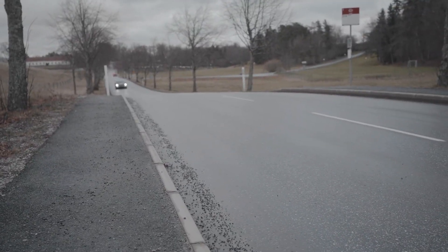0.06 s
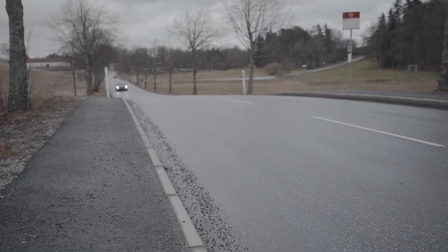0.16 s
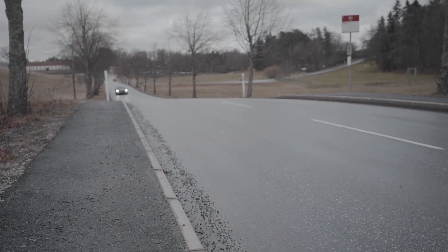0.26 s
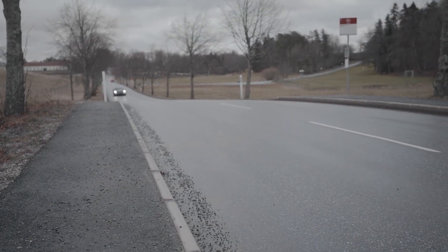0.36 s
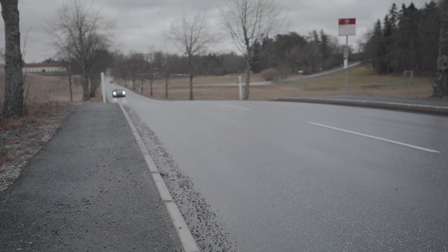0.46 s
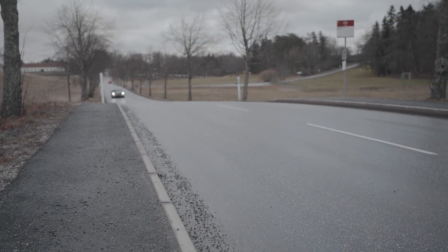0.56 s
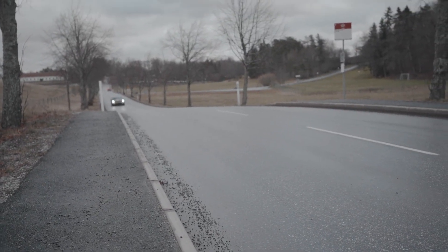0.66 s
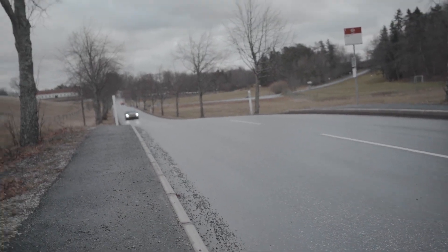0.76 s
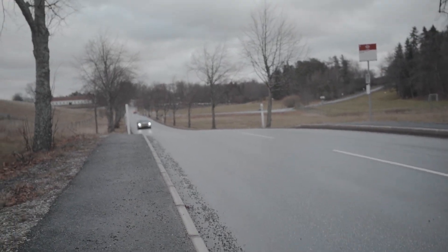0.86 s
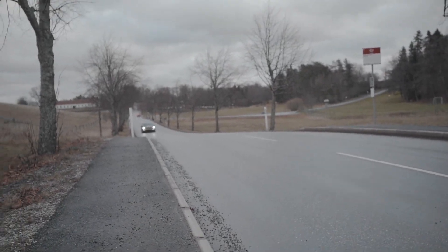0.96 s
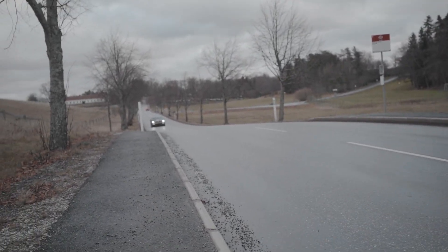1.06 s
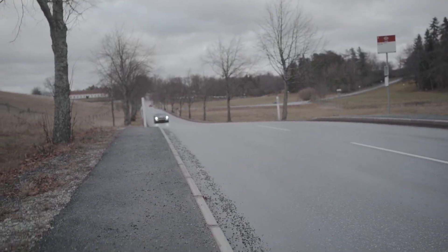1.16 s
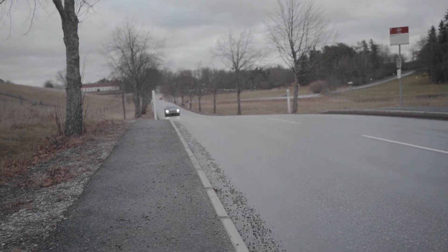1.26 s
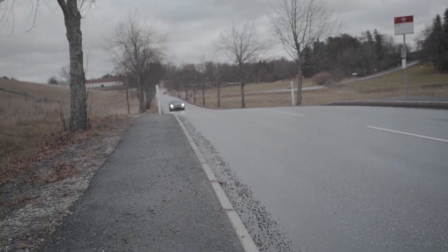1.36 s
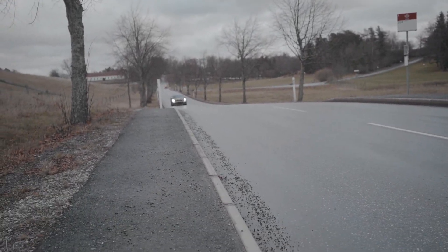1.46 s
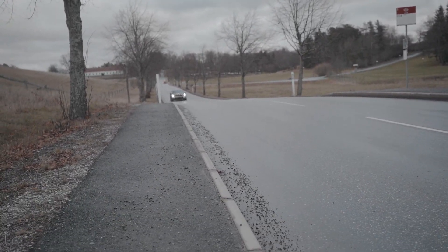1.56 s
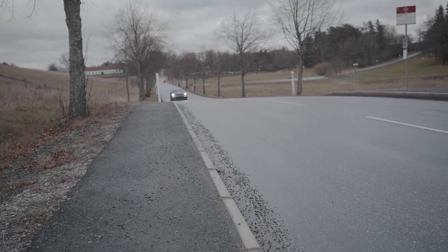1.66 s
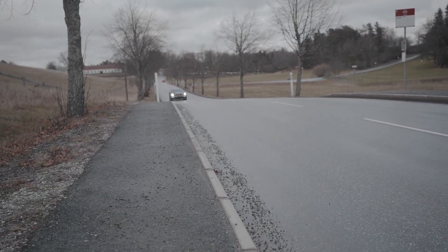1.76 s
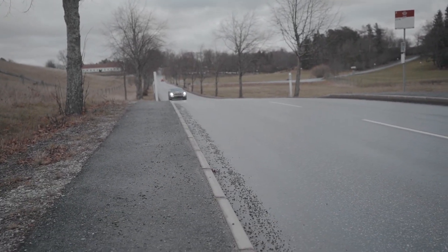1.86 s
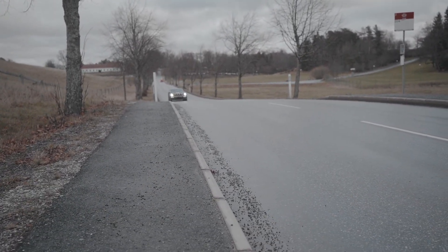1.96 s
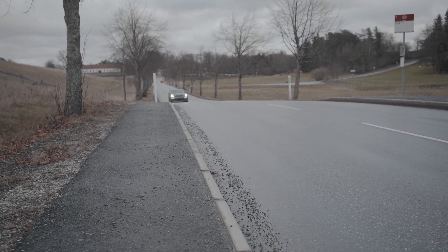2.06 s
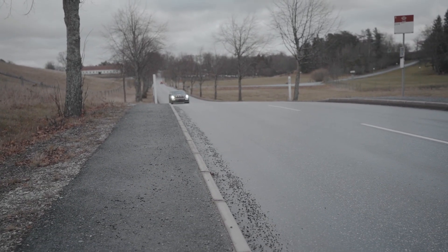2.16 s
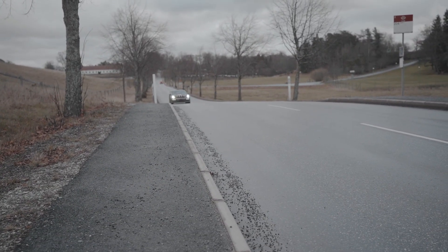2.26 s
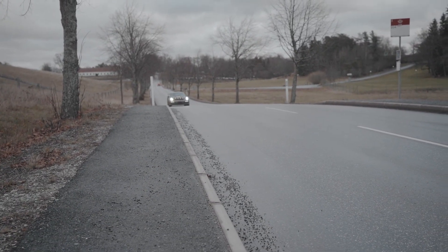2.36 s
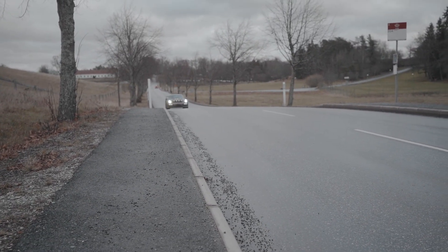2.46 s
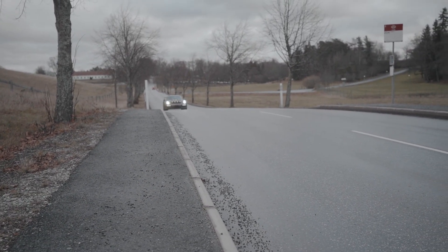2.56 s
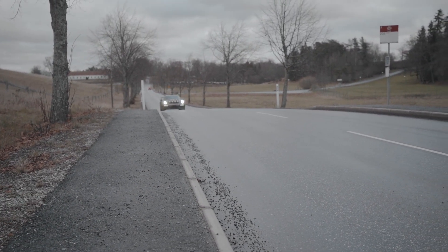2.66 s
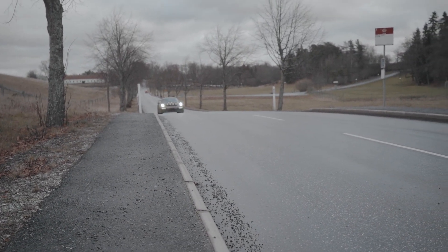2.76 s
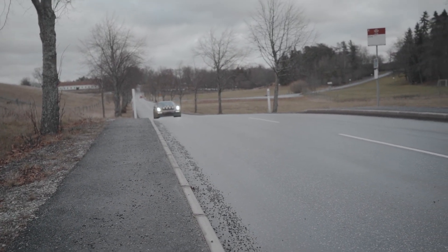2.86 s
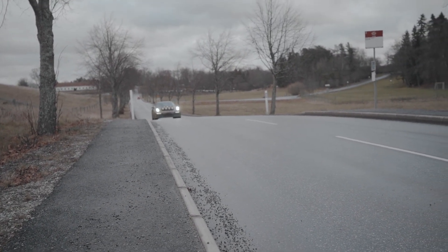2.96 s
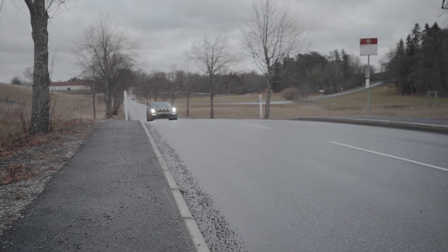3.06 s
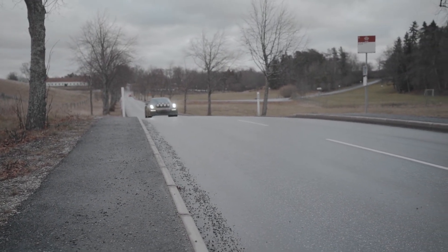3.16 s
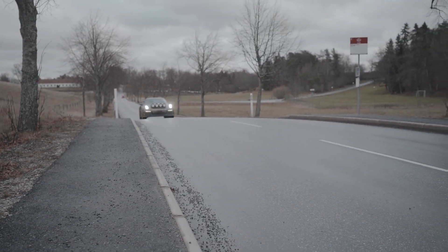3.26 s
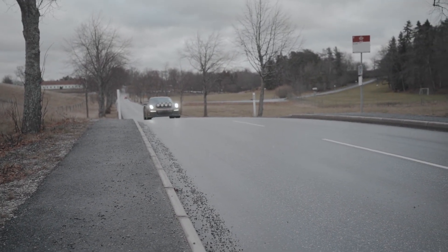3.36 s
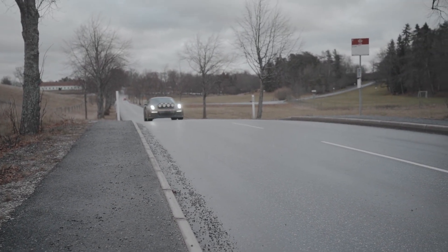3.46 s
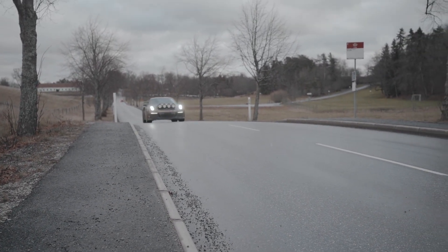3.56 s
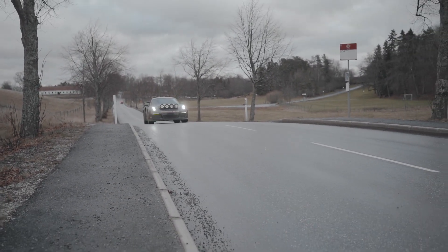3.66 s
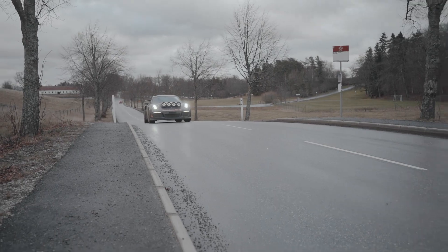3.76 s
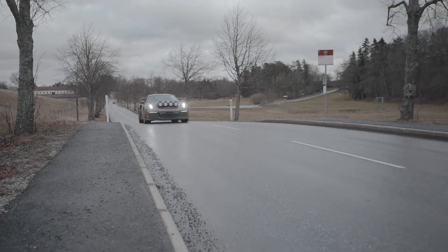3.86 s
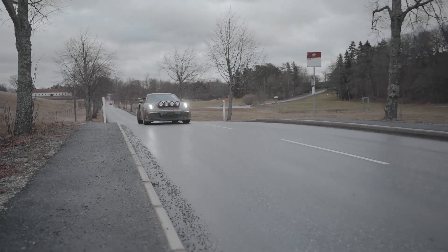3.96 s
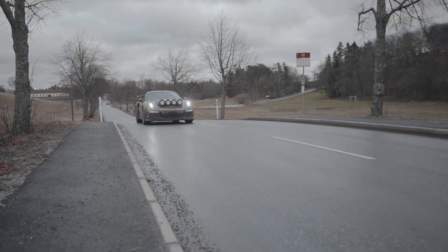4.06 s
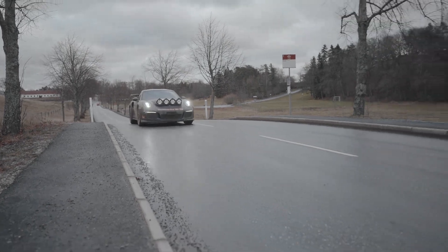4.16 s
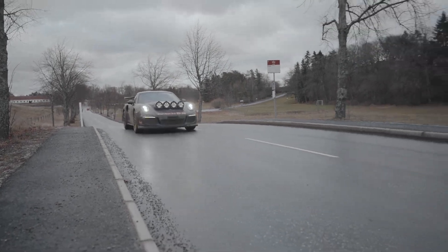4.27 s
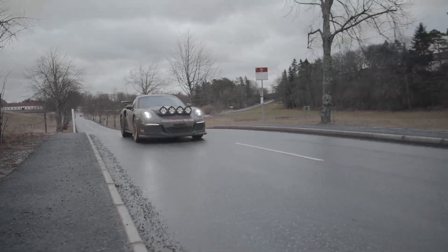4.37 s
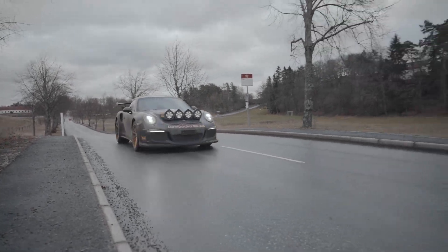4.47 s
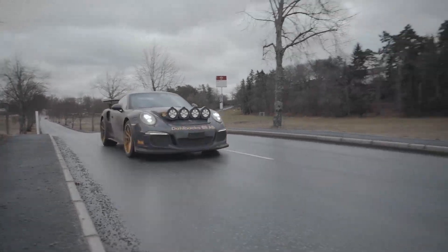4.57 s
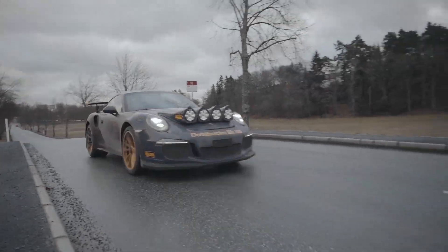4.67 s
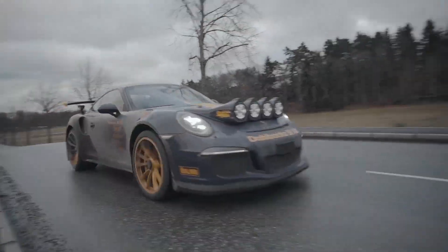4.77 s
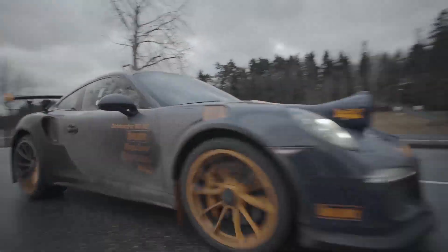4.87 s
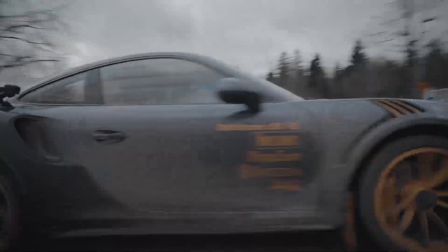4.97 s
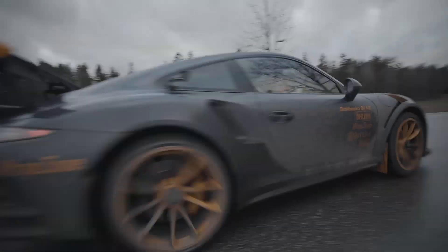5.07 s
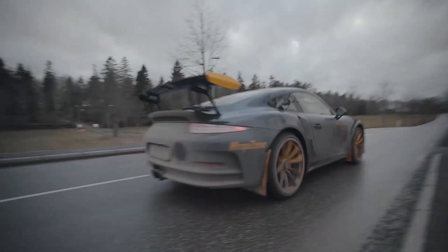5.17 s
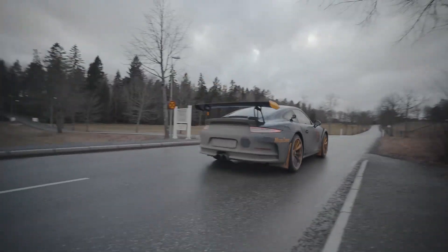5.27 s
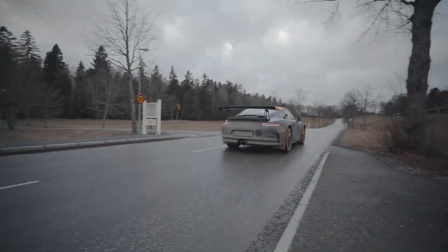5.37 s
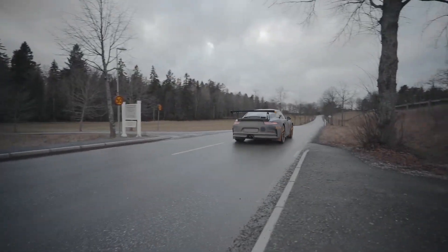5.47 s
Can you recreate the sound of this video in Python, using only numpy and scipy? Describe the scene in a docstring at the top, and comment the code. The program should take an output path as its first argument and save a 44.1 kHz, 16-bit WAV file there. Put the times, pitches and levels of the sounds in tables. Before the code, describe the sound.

On a damp country road, a light breeze rumbles against a microphone at the kerb while a sports car approaches with a steady, growing hum and hissing tyres. After nearly four seconds the engine accelerates into a snarl, pops briefly at an upshift and climbs again with one sharp exhaust crack. The car passes very close at the end, loud and distorted.

```python
"""A light breeze buffets a microphone at the kerb as a flat-six sports car cruises up a damp country road,
its tyres hissing and its periodic firing sounding a steady note through the silencer. The throttle
opens and the pulses steepen into a snarl; at the upshift the tailpipe pops in a short burble. The car
pulls on, its exhaust driving a limiter, with one sharp crack where the firing note drops out. As it
passes at arm's length the pressure overloads the input stage, which clips it towards a square wave."""
import sys
import numpy as np
from scipy import signal
from scipy.fft import rfft, irfft, next_fast_len
from scipy.io import wavfile

SR = 44100
rng = np.random.default_rng(int(sys.argv[2]) if len(sys.argv) > 2 else 0)


def to_wav(s):
    """Save 16-bit WAV."""
    ch = np.atleast_2d(s).T  # columns
    pcm = np.round(np.clip(ch, -1, 1) * 32767)  # PCM
    wavfile.write(sys.argv[1], SR, pcm.astype(np.int16))


N = 243431
TIME = np.arange(N) / SR
CYLINDERS = 6


def from_db(db):
    """Amplitude ratio of a level in decibels."""
    return 10 ** (np.asarray(db) / 20)


def unit_power(x):
    """Normalisation to a mean square of 1."""
    return x / np.sqrt(np.mean(x ** 2) + 1e-20)


def ramp(x, start, end):
    """Linear transition from 0 at start to 1 at end."""
    return np.clip((x - start) / (end - start), 0, 1)


def bell(s, width_s):
    """Gaussian envelope of height 1 around one moment."""
    return np.exp(-((TIME - s) / width_s) ** 2)


def in_time(rows):
    """Linear interpolation of each column against the times in the first."""
    s, *columns = np.transpose(rows)
    return [np.interp(TIME, s, column) for column in columns]


def gain_at(response, hz):
    """Frequency response on a logarithmic axis, falling 12 dB an octave past its last point."""
    points_hz, db = np.transpose(response)
    hz = np.maximum(hz, 1)
    return from_db(np.interp(np.log(hz), np.log(points_hz), db)) / np.maximum(hz / points_hz[-1], 1) ** 2


def drift(rate):
    """Low-pass random modulation of unit spread, changing about rate times a second."""
    step, settling = 40, 2000
    pole = np.exp(-2 * np.pi * rate * step / SR)
    white = rng.standard_normal(N // step + settling + 2)
    slow = signal.lfilter([1], [1, -2 * pole, pole * pole], white)[settling:]
    return np.interp(np.arange(N) / step, np.arange(len(slow)), unit_power(slow))


def noise(spectrum):
    """Spectral shaping of white noise, at unit power."""
    size = next_fast_len(N)
    hz = np.arange(size // 2 + 1) * SR / size
    return unit_power(irfft(rfft(rng.standard_normal(size)) * gain_at(spectrum, hz), size)[:N])


def resonant_noise(hz, width_hz):
    """Random excitation of two equal resonators in series, at unit power."""
    r = np.exp(-np.pi * width_hz / SR)
    section = [1 - r, 0, r - 1, 1, -2 * r * np.cos(2 * np.pi * hz / SR), r * r]
    return unit_power(signal.sosfilt([section, section], rng.standard_normal(N)))


def ring(impulses, hz, t60):
    """Damped oscillator: a unit impulse starts a decaying sine of height 1."""
    r, w = np.exp(-np.log(1000) / (t60 * SR)), 2 * np.pi * hz / SR
    return signal.lfilter([0, np.sin(w)], [1, -2 * r * np.cos(w), r * r], impulses + 1e-18)


def decay(x, seconds):
    """Leaky integration: every input dies away with the given time constant."""
    return signal.lfilter([1], [1, -np.exp(-1 / (seconds * SR))], x + 1e-18)


# Wind spectrum. Each row: frequency in Hz, relative density in dB.
WIND_SPECTRUM = [(3, 4), (6, 11), (11, 16), (17, 13), (25, 5), (39, -4), (62, -11), (100, -17), (200, -32)]
# The breeze rises, holds and drops to a lull. Each row: time in seconds, level in dB.
BREEZE_LEVELS = [(0, -30.5), (1.3, -18.5), (2.3, -15), (3.6, -17), (3.95, -24.5), (4.6, -25.5)]
# Separate gusts. Each row: centre in seconds, level in dB.
GUSTS = [(.16, -16), (.46, -16.5), (.58, -21), (.9, -16), (1.39, -17.5), (1.49, -17.5), (1.66, -12.5),
         (1.9, -20), (2.12, -18.5), (2.23, -18), (2.45, -24), (2.6, -21), (2.84, -22), (3.3, -19),
         (3.64, -14)]
# Single pushes of pressure. Each row: start in seconds, peak in dB, swell time constant in seconds.
BUFFETS = [(0.095, -10, .018), (0.435, -20, .005), (0.83, -14, .014), (1.158, -5, .006), (2.07, -13, .008),
           (2.33, -18, .004)]
# Faint gritty rustles. Each row: start in seconds, length in seconds, level in dB.
RUSTLES = [(.7, 0.75, -71.5), (2.945, 0.081, -67), (3.39, 0.014, -64)]


def breeze():
    """Turbulence at the microphone gives slow pressure fluctuations, with a few tiny rustles."""
    steady = from_db(in_time(BREEZE_LEVELS)[0] + 2 * drift(4.2))
    gusts = sum(from_db(db) * bell(s, width_s=0.05) for s, db in GUSTS)
    pressure = (steady + gusts) * noise(WIND_SPECTRUM)
    for s, db, swell_s in BUFFETS:
        age = np.clip((TIME - s) / swell_s, 0, 20)
        pressure -= from_db(db) * (age / 2) ** 2 * np.exp(2 - age)
    rustling = sum(from_db(db) * bell(s + length / 2, length / 2) for s, length, db in RUSTLES)
    grit = from_db(2.5 * drift(120)) * resonant_noise(hz=10500, width_hz=9000)
    return pressure + rustling * grit


PASS_S, SPEED_M_PER_S, CLOSEST_M = 5.307, 11.77, 1.835
HIDDEN_M, CLEAR_M = 49.4, 17.5   # between these distances the car comes over a crest
SHIELD_M = 12.5   # nearer than this, the body stops hiding the rear engine
THROTTLE_S, OPENING_S, BARK_S, SHIFT_S = 3.782, 0.19, 3.91, 4.135


def ahead_m():
    """Uniform motion: the road left before the tail is level with the microphone."""
    return SPEED_M_PER_S * (PASS_S - TIME)


def voice_gain(voice):
    """Spreading, shadowing, directivity and engine load set the gain of one voice of the car."""
    # Each voice lists, in dB: base level at the closest point, loss per doubling of distance,
    # loss behind the crest, gain at full load, gain in the bark of pick-up, gain from the rear.
    close_db, doubling_db, crest_db, load_db, bark_db, rear_db = voice
    ahead = ahead_m()
    doublings = np.log2(np.hypot(ahead, CLOSEST_M) / CLOSEST_M)
    path_loss_db = doubling_db * doublings + crest_db * ramp(ahead, CLEAR_M, HIDDEN_M)
    facing_db = rear_db * ramp(ahead, SHIELD_M, 0)
    shift_cut = 0.89 * bell(SHIFT_S, width_s=0.04)
    load = ramp(TIME, THROTTLE_S, THROTTLE_S + OPENING_S) * (1 - shift_cut)
    engine_db = load_db * load + bark_db * bell(BARK_S, width_s=0.1)
    return from_db(close_db - path_loss_db + facing_db + engine_db)


# Distant road noise. Each row: time in seconds, roar level in dB, hiss level in dB.
FAR_ROAD = [(0.03, -38, -61), (0.2, -41, -60), (0.35, -40.5, -52), (1.31, -47, -53), (1.36, -45, -57),
            (1.98, -50, -54), (2.2, -48.5, -49)]
# Tyre and gas roar, wet hiss and fine spray. Each row: frequency in Hz, relative density in dB.
ROAR_SPECTRUM = [(100, -10.5), (250, -8.5), (450, 0), (660, -1), (850, 0.5), (1150, 0.5), (1550, -3),
                 (2000, -11), (2800, -19.5), (4500, -47.5), (9000, -36)]
HISS_SPECTRUM = [(800, -21), (2000, 2), (3300, -2), (4000, -6.5), (5300, -11.5), (6200, -17), (8500, -17),
                 (9800, -29.5), (13000, -32), (15500, -33.5)]
SPRAY_SPECTRUM = [(2000, 0.5), (5000, 2), (6500, -4.5), (9000, -0.5), (10800, -15), (13000, -10),
                  (16000, -17)]
# Their levels in dB, as listed in voice_gain.
ROAR_VOICE = (-8.5, 6.5, 8.5, -1, 4.5, 19)
HISS_VOICE = (-4, 11.5, -1.5, -2, 7, 14)
SPRAY_VOICE = (-3.5, 16, 33, -2.5, 6.5, 8.5)
# The car's thin whine. Each row: frequency in Hz, resonator bandwidth in Hz, level in dB.
WHINE_BANDS = [(3220, 45, -63), (3596, 38, -65)]


def road_noise(phase):
    """Broadband noise of tyres, gas and spray; near and far sources are incoherent and add in power."""
    far_roar_db, far_hiss_db = in_time(FAR_ROAD)
    roar_gain = np.hypot(voice_gain(ROAR_VOICE), from_db(far_roar_db))
    hiss_gain = np.hypot(voice_gain(HISS_VOICE), from_db(far_hiss_db))
    throb = unit_power(1 + 0.09 * np.cos(phase) + 0.054 * np.cos(phase / 2))   # each firing, each bank
    lowpass = signal.butter(3, 5000, fs=SR, output="sos")
    roar = roar_gain * from_db(0.72 * drift(6.7)) * throb * signal.sosfilt(lowpass, noise(ROAR_SPECTRUM))
    hiss = hiss_gain * from_db(0.5 * drift(5)) * noise(HISS_SPECTRUM)
    whine = sum(from_db(db) * resonant_noise(hz, width) for hz, width, db in WHINE_BANDS)
    spray = voice_gain(SPRAY_VOICE) * noise(SPRAY_SPECTRUM)
    return roar + hiss + spray + whine * ramp(TIME, 0, 0.29)


# Transmission of the silencer. Each row: frequency in Hz, gain in dB.
SILENCER_RESPONSE = [(60, -5.5), (200, 3), (310, -1), (470, -2.5), (560, -3.5), (680, -16.5), (1100, -21.5),
                     (2200, -21)]


def harmonics(orders, phase, hz, flutter, rate, response=SILENCER_RESPONSE):
    """Source and filter: harmonics sweep through a fixed response, fluttering in level and phase."""
    total = 0
    for multiple, db in orders:
        angle = multiple * phase + rng.uniform(0, 2 * np.pi)
        wave = (1 + flutter * drift(rate)) * np.sin(angle) + flutter * drift(rate) * np.cos(angle)
        total += np.sqrt(2) * from_db(db) * gain_at(response, multiple * hz) * wave
    return total


# Low engine orders. Each row: multiple of the six-firing cycle, level before the silencer in dB.
THROB_ORDERS = [(2, -4), (3, -8.5), (4, -7)]
# Churned air beside the car. Each row: frequency in Hz, relative density in dB.
CHURN_SPECTRUM = [(10, 3), (30, 9.5), (70, -15), (110, 5), (180, -7.5), (300, -13.5), (700, -38.5)]


def wake(phase, firing_hz):
    """Near field: churning air and the lowest engine orders are felt only beside and behind the car."""
    full_db, reach_m, loss_db_per_m = 9.5, 2.2, 8.5
    throb = harmonics(THROB_ORDERS, phase / CYLINDERS, firing_hz / CYLINDERS, flutter=0.28, rate=6)
    gain = from_db(full_db - loss_db_per_m * np.maximum(ahead_m() - reach_m, 0))
    return gain * (noise(CHURN_SPECTRUM) + throb)


# A run of tailpipe pops at the shift, then a sharp crack where the firing note drops out.
# Each row: start in seconds, thump in dB, crack in dB.
POPS_AND_CRACK = [(4.113, -13, -5.5), (4.127, -12.5, -19), (4.135, -12, -29), (4.149, -16, -16),
                  (4.155, -12.5, -9.5), (4.165, -10, -24), (4.180, -10, 1), (4.191, -11.5, -3),
                  (4.617, -16, 5)]
# Low and bright tailpipe modes. Each row: frequency in Hz, gain in dB, time to fall 60 dB in seconds.
THUMP_MODES = [(112, -1, 0.052), (330, -2, 0.0095), (575, -2.5, 0.037)]
CRACK_MODES = [(1450, -20, 0.01), (1607, -13, 0.024), (2660, -23, 0.0059)]


def pops_and_crack():
    """Impulse excitation: each onset rings low and bright damped modes, with a short puff of noise."""
    start_s, thump_db, crack_db = np.transpose(POPS_AND_CRACK)
    onsets = (start_s * SR).astype(int)
    thumps = np.bincount(onsets, from_db(thump_db), N)
    cracks = np.bincount(onsets, from_db(crack_db), N)
    low = sum(from_db(db) * ring(thumps, hz, t60) for hz, db, t60 in THUMP_MODES)
    bright = sum(from_db(db) * ring(cracks, hz, t60) for hz, db, t60 in CRACK_MODES)
    puff = from_db(-26) * decay(thumps, seconds=0.0056) * noise(ROAR_SPECTRUM)
    return bright - low + puff


# Spectral envelope of the snarl. Each row: frequency in Hz, gain in dB.
SNARL_RESPONSE = [(550, -15.5), (810, -6.5), (1000, -8.5), (1200, -10.5), (1400, -4.5), (1680, -9),
                  (2000, -15.5), (2600, -22.5), (3600, -41.5)]
# Its levels in dB, as listed in voice_gain.
SNARL_VOICE = (-23.5, 9.5, -12, 12, 15, 24)


def snarl(phase, firing_hz):
    """Pulse steepening under load raises high harmonics; two unequal banks add a rasp between them."""
    bank_orders = [(k, -6 * (k % 2)) for k in range(6, 25)]   # odd orders 6 dB weaker
    rasp = harmonics(bank_orders, phase / 2, firing_hz / 2, flutter=0.55, rate=14, response=SNARL_RESPONSE)
    return voice_gain(SNARL_VOICE) * rasp


# Firing harmonics. Each row: multiple of the firing rate, level before the silencer in dB.
OVERTONES = [(2, 0.5), (3, -1.5), (4, -13.5), (5, -10.5), (6, -4)]
# Unequal cylinders. Each row: multiple of the six-firing cycle, level before the silencer in dB.
BURBLE_ORDERS = [(2, -4.5), (3, -13.5), (4, -6), (7, -7.5), (8, -1), (9, 1.5), (10, 3.5), (11, -3.5),
                 (13, -23.5), (14, -6.5), (15, -1), (16, -4), (17, -8), (19, -14), (20, -10), (21, -4),
                 (27, -8), (33, -8)]
# Brief dips of the firing note. Each row: centre in seconds, width in seconds, share of amplitude lost.
NOTE_DIPS = [(4.63, 0.1, 0.3), (4.603, 0.021, 0.92)]
# Levels of the note, overtones and burble in dB, as listed in voice_gain.
NOTE_VOICE = (1.12, 5.85, 9.3, 10.7, 1.3, 9.57)
OVERTONE_VOICE = (-5.5, 6.0, 9, 6.5, 2.0, 16.5)
BURBLE_VOICE = (-16.0, 6.0, 6, -4, 5, 15.5)


def exhaust(phase, firing_hz):
    """Periodic firing gives a harmonic series, coloured by the resonances of pipe and silencer box."""
    pipe_hz, howl_width_hz = 478, 18
    dips = np.prod([1 - share * bell(s, width_s) for s, width_s, share in NOTE_DIPS], axis=0)
    note = from_db(0.5 * drift(20)) * dips * np.sin(phase)
    # The second harmonic howls as it sweeps through the pipe resonance.
    tuning = np.exp(-((2 * firing_hz - pipe_hz) / howl_width_hz) ** 2)
    howl = from_db(-10) * tuning * np.sin(2 * phase)
    overtones = harmonics(OVERTONES, phase, firing_hz, flutter=0.18, rate=11.7)
    burble = harmonics(BURBLE_ORDERS, phase / CYLINDERS, firing_hz / CYLINDERS, flutter=0.31, rate=5)
    box_boom = from_db(4) * resonant_noise(hz=229.5, width_hz=40)
    gas_rush = from_db(-30.5) * resonant_noise(pipe_hz, width_hz=310)
    return (np.sqrt(2) * voice_gain(NOTE_VOICE) * (note + howl + gas_rush)
            + voice_gain(OVERTONE_VOICE) * overtones
            + voice_gain(BURBLE_VOICE) * (burble + box_boom))


# Engine speed at cruise, then under power. Each row: time in seconds, firing rate in Hz.
CRUISE_RATES = [(0.0, 151.3), (0.14, 154.3), (0.56, 152.9), (1.59, 152.8), (2.6, 153.4), (2.66, 154.1),
                (3.76, 154.0)]
PULL_RATES = [(3.79, 153.8), (3.91, 185.3), (4.024, 210.4), (4.072, 220.3), (4.126, 213.1), (4.178, 207.5),
              (4.252, 223.6), (4.28, 228.3), (4.4, 223.4), (4.516, 227.6), (4.612, 242.1), (4.746, 246.8),
              (4.872, 256.2), (5.002, 276.4), (5.04, 272.9), (5.272, 273.4), (5.3, 272.0), (5.42, 275.1),
              (5.444, 278.8), (5.52, 281.2)]


def scene():
    """Superposition of car and breeze; one crankshaft phase times all the engine's harmonics."""
    wander = 0.0023 * drift(8.5)
    rear_jitter = 0.0073 * ramp(ahead_m(), SHIELD_M, 0) * drift(81)
    firing_hz = in_time([*CRUISE_RATES, *PULL_RATES])[0] * (1 + wander + rear_jitter)
    phase = 2 * np.pi * np.cumsum(firing_hz) / SR
    engine = exhaust(phase, firing_hz) + snarl(phase, firing_hz)
    car = engine + road_noise(phase) + wake(phase, firing_hz) + pops_and_crack()
    return (car + breeze())[None]


def limiter(x, limit_db, attack_s, release_db_per_s):
    """Automatic gain control holds the running level to the limit: quick to duck, slower to let go."""
    level_db = 10 * np.log10(decay(x ** 2, attack_s) / (attack_s * SR) + 1e-12)
    release_db = release_db_per_s * TIME
    held_db = np.maximum.accumulate(level_db + release_db, axis=-1) - release_db
    return x * from_db(-np.maximum(held_db - limit_db, 0))


def record(dry):
    """Saturation flattens the peaks, AC coupling tilts them, and a limiter and a low-pass follow."""
    ceiling, coupling_hz, cutoff_hz = from_db(6.5), 28, 15750
    drive = signal.resample_poly(dry, 2, 1, axis=-1) / ceiling   # oversampled against aliasing
    clipped = ceiling * signal.resample_poly(drive / (1 + drive ** 8) ** (1 / 8), 1, 2, axis=-1)
    coupled = signal.sosfilt(signal.butter(1, coupling_hz, "high", fs=SR, output="sos"), clipped)
    held = limiter(coupled, limit_db=-11.5, attack_s=0.0049, release_db_per_s=205.5)
    return signal.fftconvolve(held, signal.firwin(401, cutoff_hz, fs=SR)[None], "same")


dry = scene()
out = record(dry)
to_wav(out)
```